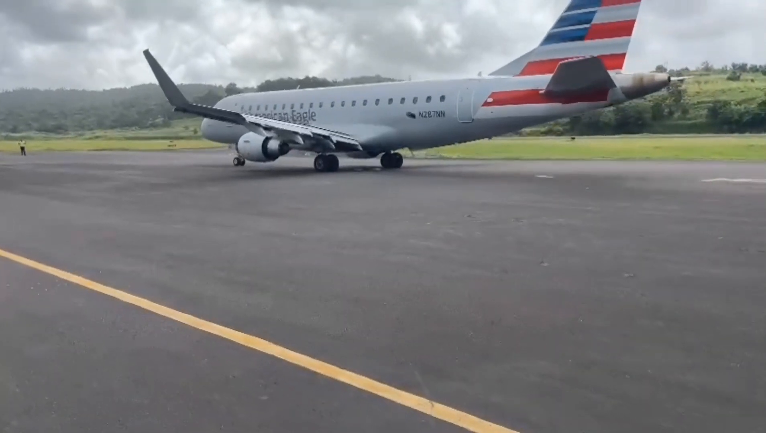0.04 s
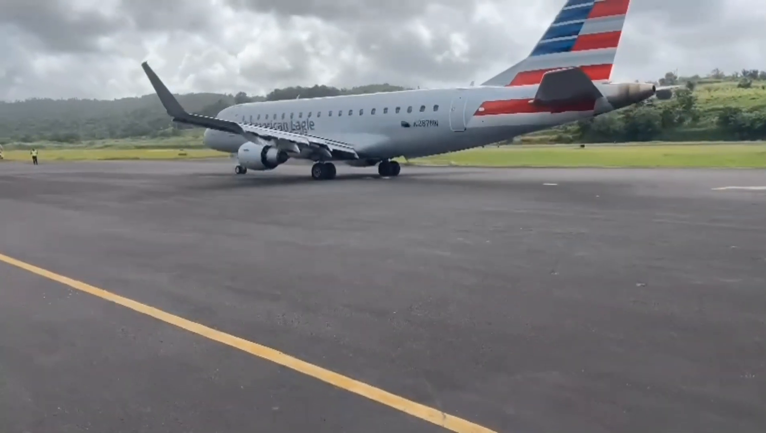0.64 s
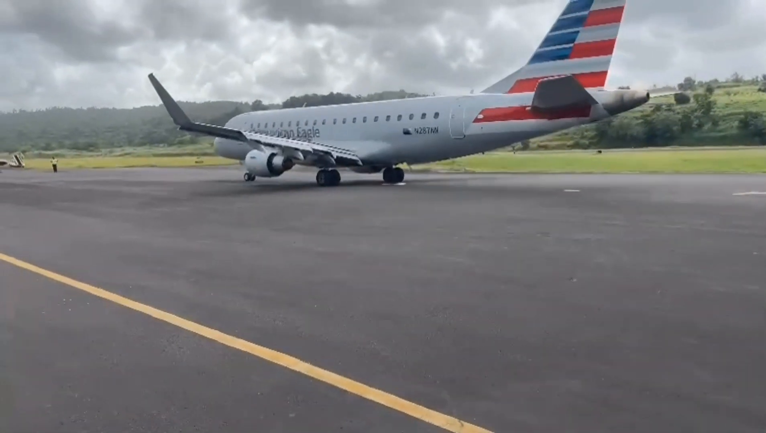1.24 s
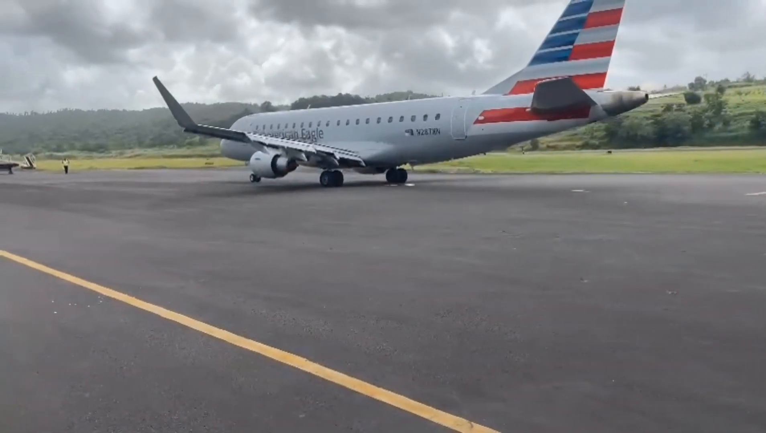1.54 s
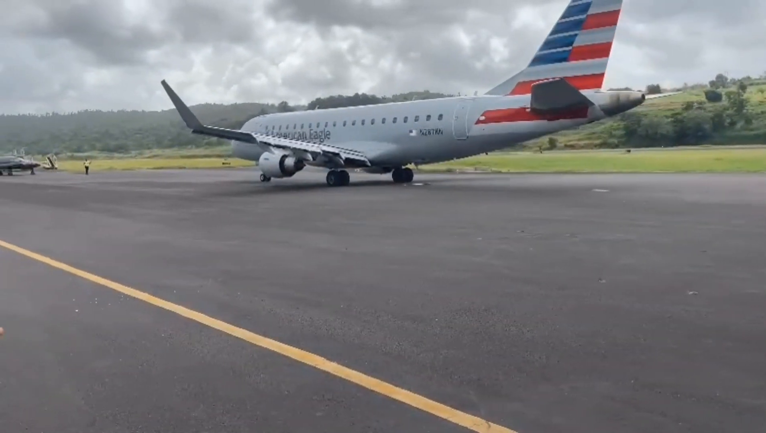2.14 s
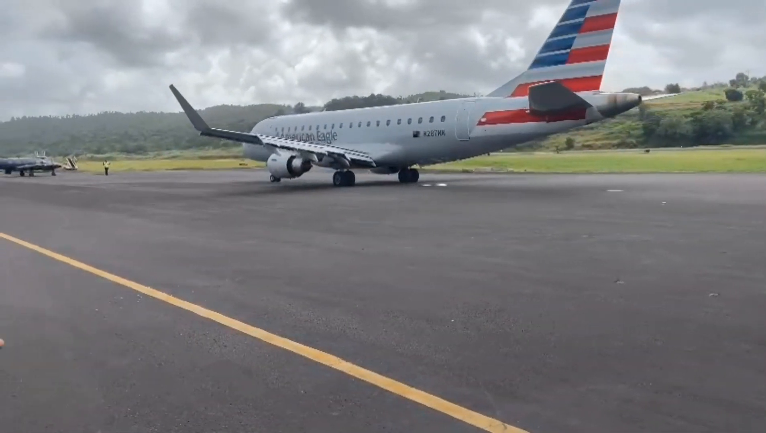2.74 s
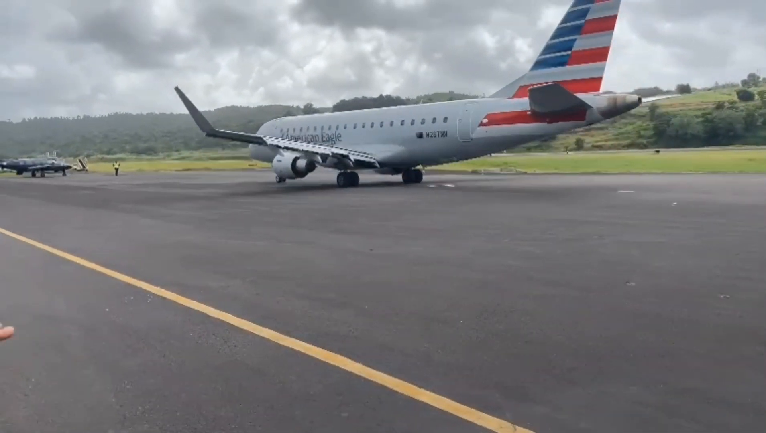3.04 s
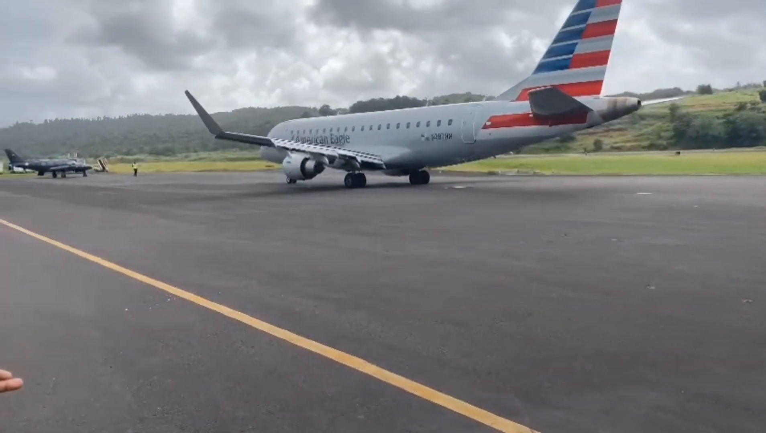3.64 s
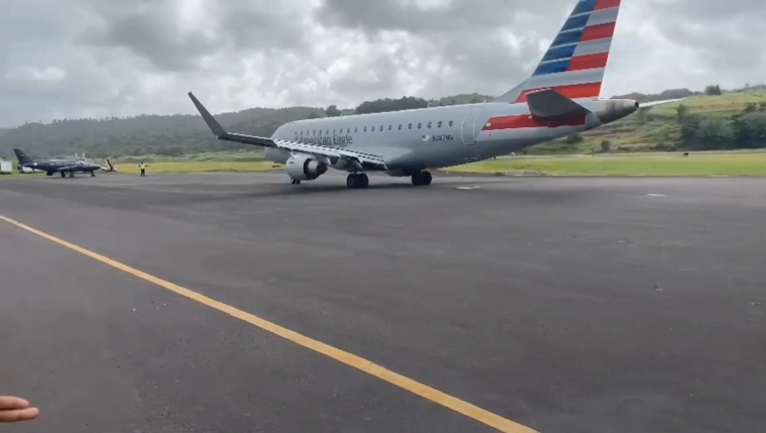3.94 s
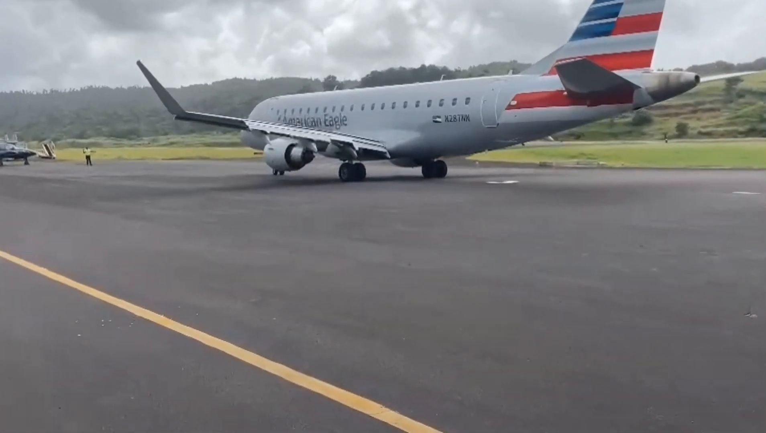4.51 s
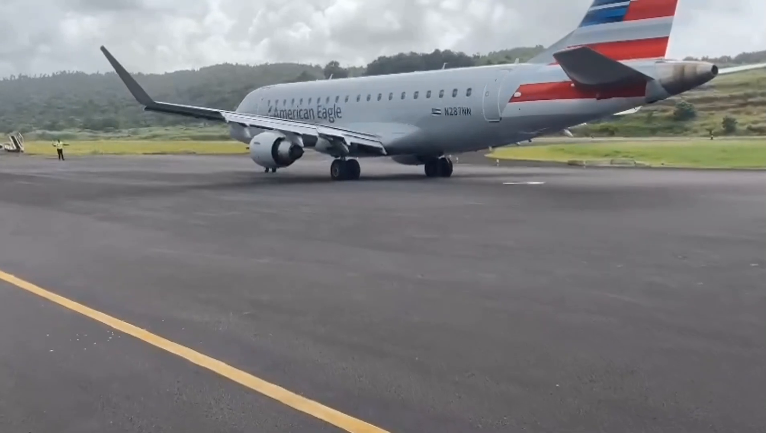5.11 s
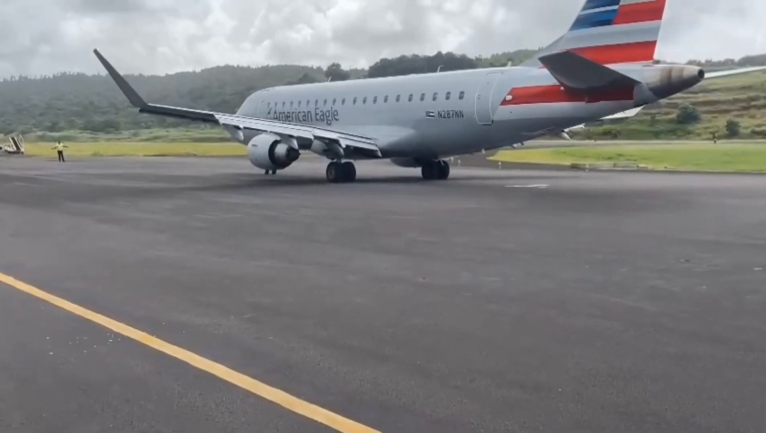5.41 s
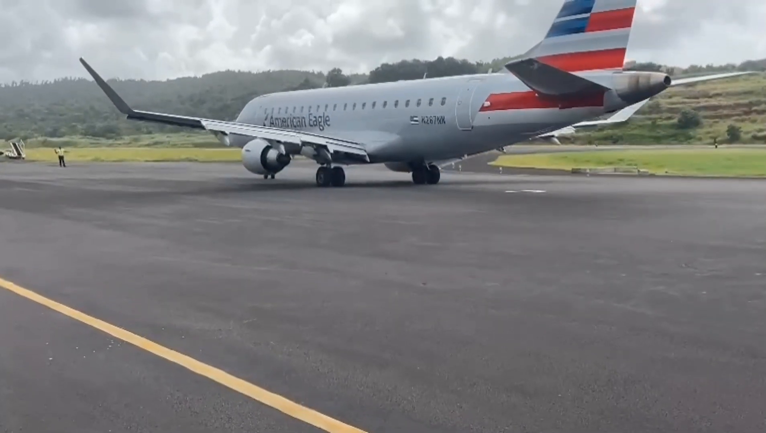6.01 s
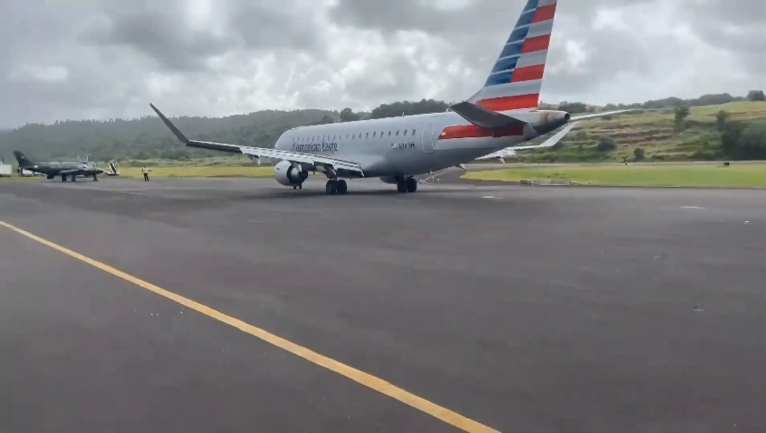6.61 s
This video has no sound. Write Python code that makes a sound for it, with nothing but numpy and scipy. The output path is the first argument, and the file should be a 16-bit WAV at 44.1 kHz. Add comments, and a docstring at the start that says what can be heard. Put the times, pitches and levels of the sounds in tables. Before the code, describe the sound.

High, wavering whistles and a rushing rumble come from a slowly departing jet's idling engines, while a breeze buffets the microphone.

```python
"""Regional jet taxiing away

Two idling turbofans move off across an open ramp. Exhaust rumble, core roar and blade hiss form
the bed; the fans hum over it and the compressor and turbine stages whistle. A breeze bumps the
hand-held microphone pair, which narrows its pickup onto the jet for two seconds near the end."""
import sys
import numpy as np
from scipy import signal
from scipy.fft import rfft, irfft
from scipy.io import wavfile

SR = 44100
rng = np.random.default_rng(int(sys.argv[2]) if len(sys.argv) > 2 else 0)


def int16_out(signal):
    """Quantize to a 16-bit WAV file."""
    q = np.round(np.clip(np.atleast_2d(signal).T, -1, 1) * 32767)
    wavfile.write(sys.argv[1], SR, q.astype(np.int16))


N = 302526
TIME = np.arange(N) / SR
BINS = np.fft.rfftfreq(N, 1 / SR)

# fader ride of the core roar and the duct howl: time_s, relative_db
CORE_RIDE = [(0, -24), (1.1, -23.5), (1.9, -25), (2.6, -24.5), (3.1, -26.5), (4.2, -21.5), (4.9, -24),
             (5.2, -27), (5.6, -28), (6.2, -29), (6.86, -34.5)]
# fader ride of the turbine's hiss and whistles: time_s, relative_db
TURBINE_RIDE = [(0, -32), (1.5, -36), (1.8, -34.5), (2.2, -34.5), (2.85, -41.5), (3.5, -34.5), (3.8, -36),
                (4.05, -29), (4.4, -34.5), (4.65, -31.5), (4.9, -37.5), (5.45, -35.5), (5.9, -41),
                (6.2, -40.5), (6.4, -47.5), (6.86, -50)]
# narrowing of the pickup: time_s, focus (0 wide, 1 narrow)
PICKUP_FOCUS = [(4.2, 0), (4.55, .35), (4.75, .75), (5.15, 1), (6.45, 1), (6.68, .25), (6.86, .2)]


def from_db(db):
    """Decibels to gain."""
    return 10 ** (np.asarray(db) / 20)


def rms_one(x):
    """Scale to unit power."""
    return x / np.sqrt(np.mean(np.abs(x) ** 2) + 1e-20)


def in_time(rows, t=TIME):
    """Each column of a curve table, joined by straight lines."""
    times, *columns = np.transpose(rows)
    return [np.interp(t, times, column) for column in columns]


def at_hz(points, hz, beyond=None):
    """Read a table on a log-frequency axis."""
    knots_hz, value = np.transpose(points)
    return np.interp(np.log(hz + 1e-9), np.log(knots_hz), value, left=beyond, right=beyond)


def follow(ride, mean_db, depth=1):
    """Gain that follows a fader ride, centred on mean_db with its swing scaled by depth."""
    level_db, = in_time(ride)
    return from_db(mean_db + depth * (level_db - level_db.mean()))


def swells(rows):
    """Gain that rises and falls in a bell around each listed moment."""
    return sum(from_db(db) * np.exp(-((TIME - peak_s) / half_s) ** 2) for peak_s, db, half_s in rows)


def noise(gain):
    """Two unrelated noises with the given gain per frequency, at unit power."""
    return rms_one(irfft(rfft(rng.standard_normal((2, N))) * gain, N))


def coloured(spectrum):
    """Noise with a tabled spectrum, silent outside it."""
    return noise(from_db(at_hz(spectrum, BINS, beyond=-np.inf)))


def humps(rows):
    """Noise gathered in resonances."""
    return sum(from_db(db) * noise(1 / (1 + ((BINS - hz) / width) ** 2)) for hz, width, db in rows)


def drift(rate_hz):
    """Random wander with spread 1, mostly slower than rate_hz."""
    return noise(1 / (1 + (BINS / rate_hz) ** 2))[0]


def shimmer(depth_db, rate_hz):
    """Hot exhaust and wind make the sound swell and fade on its way."""
    return from_db(depth_db * drift(rate_hz))


def blade_tone(hz, wander_hz, flutter_db, flutter_hz):
    """One blade row's wavering sine; each path fades on its own and the scattered one drifts in phase."""
    phase = 2 * np.pi * np.cumsum(hz + wander_hz * drift(9.4)) / SR
    offsets = (0, np.pi * drift(4.4))
    paths = [shimmer(flutter_db, flutter_hz) * np.sin(phase + offset) for offset in offsets]
    return rms_one(np.array(paths))


def puff(start_s, level_db, start_hz, end_hz=48, glide_s=0.0069, rise_s=0.0033, decay_s=0.022):
    """A puff hits one microphone port: a low thud that sinks in pitch as the eddy passes."""
    age = np.maximum(TIME - start_s, 0)
    hz = end_hz + (start_hz - end_hz) * np.exp(-age / glide_s)
    phase = 2 * np.pi * np.cumsum(hz * (age > 0)) / SR
    envelope = (1 - np.exp(-(age / rise_s) ** 2)) * np.exp(-age / decay_s)
    return from_db(level_db) * envelope / envelope.max() * np.sin(phase)


def breeze(calm_db=-58):
    """Lumpy low turbulence, different at each port, that swells in gusts and lands one strong puff."""
    # gusts over the calm: peak_s, peak_db, half_length_s
    gusts = [(0.36, -39, 0.06), (1.4, -51, 2.9), (2.03, -50, 0.09), (3.28, -44, 0.075), (4.13, -34, 0.14),
             (4.23, -32, 0.02), (4.31, -29, 0.025), (6.1, -45, 0.5), (6.78, -38, 0.2)]
    # colour of the wind on the ports: frequency_hz, relative_db
    spectrum = [(15, -20), (40, -12), (60, 17), (100, -6), (250, 9), (600, -65)]
    # the strong puff, left port then right: start_s, level_db, start_hz
    puff_hits = [(3.852, -7, 325), (3.854, -5.5, 236)]
    strength = from_db(calm_db) + swells(gusts)
    eddies = strength * coloured(spectrum) * shimmer(2.4, 13)
    return eddies + np.array([puff(*hit) for hit in puff_hits])


def exhaust_rumble():
    """The exhaust mixes with the air: a surging rumble that buffets in a narrow low band."""
    # colour of the rumble: frequency_hz, relative_db
    spectrum = [(20, -37), (40, -22), (60, -19), (85, -5), (120, 2), (200, -3), (300, -3.5), (370, -7),
                (440, -17), (520, -23), (700, -27)]
    # its fader ride: time_s, relative_db
    ride = [(0, -27), (1.1, -25.5), (2.3, -29), (3.3, -24.5), (4.2, -29), (4.6, -31), (5.2, -28),
            (5.6, -33), (6.3, -31.5), (6.86, -39)]
    # its brief surges: peak_s, peak_db, half_length_s
    surges = [(3.31, -28, 0.035), (4.41, -26, 0.031), (5.12, -30, 0.04), (5.6, -33, 0.047),
              (6.02, -31, 0.017), (6.25, -39, 0.091)]
    # buffets: peak_s, peak_db, half_length_s
    buffets = [(4.055, -22.5, 0.033), (4.65, -28.5, 0.3), (5.375, -24, 0.018)]
    # the band they shake: centre_hz, half_width_hz, gain_db
    buffet_band = [(223, 64, -2.5)]
    strength = np.hypot(follow(ride, mean_db=-30, depth=0.75), swells(surges))
    rumble = strength * coloured(spectrum) * shimmer(0.6, 36)
    return rumble + swells(buffets) * humps(buffet_band)


def core_roar():
    """Midrange roar of the engine cores, with a hump of blade noise scattered by turbulence."""
    # colour of the roar: frequency_hz, relative_db
    spectrum = [(380, -25), (480, -11.5), (620, 2.5), (720, 2), (850, -1.5), (1040, -2), (1150, -1.5),
                (1250, -1.5), (1400, 0), (1520, -2.5), (1650, -11.5), (1900, -8), (2200, -13), (2550, -55)]
    # scattered blade noise: centre_hz, half_width_hz, gain_db
    blade_hump = [(891.5, 28, -9)]
    roar = coloured(spectrum) + humps(blade_hump)
    return follow(CORE_RIDE, mean_db=-29.5, depth=0.89) * roar * shimmer(1.0, 17)


def intake_hiss(level_db=-34, turn_s=2.03, fall_db_per_s=8.6):
    """Whistling hiss beamed forwards: it holds, then falls steadily as the intakes turn away."""
    # resonances in the beam: centre_hz, half_width_hz, gain_db
    resonances = [(919, 28, -4), (2950, 32, -11.5), (3050, 47, -11), (4840, 450, -2.5)]
    beam = from_db(level_db - fall_db_per_s * np.maximum(TIME - turn_s, 0))
    return beam * humps(resonances)


def fan_hiss():
    """Broad hiss of the fan blades."""
    # colour of the hiss: frequency_hz, relative_db
    spectrum = [(1950, -16), (2250, 2.5), (2800, 3), (3500, 4), (4200, 4), (4800, 1.5), (5400, 1),
                (5850, -19)]
    # its fader ride: time_s, relative_db
    ride = [(0, -29.5), (1, -31.5), (2, -34), (2.7, -32), (3.1, -34), (3.8, -31), (4.4, -33.5), (4.65, -30),
            (4.85, -35), (5.05, -32), (5.2, -36), (5.5, -34.5), (5.9, -37.5), (6.2, -38.5), (6.55, -41.5),
            (6.86, -39.5)]
    return follow(ride, mean_db=-38) * coloured(spectrum) * shimmer(1.0, 27)


def turbine_hiss():
    """A brighter, narrower band of hiss from the turbine blades."""
    # colour of the hiss: frequency_hz, relative_db
    spectrum = [(5050, 5), (5450, 1), (5700, 8.5), (6150, 7.5), (6550, 7.5), (6800, 3), (7400, -46)]
    return follow(TURBINE_RIDE, mean_db=-39, depth=0.93) * coloured(spectrum) * shimmer(1.0, 25)


def hiss_swells():
    """The hiss flares briefly in one broad band."""
    # flares: peak_s, peak_db, half_length_s
    flares = [(4.08, -31, 0.25), (4.63, -43, 0.13)]
    # their band: centre_hz, half_width_hz, gain_db
    band = [(5060, 600, -5.5)]
    return swells(flares) * humps(band)


def high_hiss():
    """Airy blade hiss above the turbine's band."""
    # colour of the hiss: frequency_hz, relative_db
    spectrum = [(6550, -17), (6950, 0), (7400, 0.5), (8200, -3.5), (8550, -0.5), (9100, -1), (9350, -5),
                (9600, -22)]
    # its fader ride: time_s, relative_db
    ride = [(0, -42), (1.5, -42), (2.2, -40.5), (2.4, -46), (2.7, -44), (3.7, -43.5), (4.2, -39.5),
            (4.75, -40), (5.1, -44.5), (5.5, -42), (5.9, -46), (6.2, -45), (6.35, -50), (6.86, -54)]
    return follow(ride, mean_db=-43.8) * coloured(spectrum)


def sizzle():
    """Flickering top treble, threaded with faint whistles of the late stages."""
    # colour of the sizzle: frequency_hz, relative_db
    spectrum = [(9200, -32), (9550, 6), (10000, 3), (11100, 2.5), (11750, -9)]
    # whistles against the sizzle: centre_hz, half_width_hz, gain_db
    whistles = [(9268, 18, -4), (11055, 11, -21)]
    # fader ride of both: time_s, relative_db
    ride = [(0, -51), (0.3, -49.5), (0.7, -46.5), (1.5, -49.5), (2.2, -45), (2.4, -49), (2.65, -48.5),
            (2.85, -50), (3.6, -48.5), (4.1, -46), (4.3, -52), (4.65, -47), (5.1, -53), (5.5, -49.5),
            (6.25, -60), (6.86, -57)]
    return follow(ride, mean_db=-50.5) * (coloured(spectrum) + humps(whistles)) * shimmer(2.43, 15)


def fan_hum():
    """The fans hum at their blade passing rate, sinking slowly as the jet moves off."""
    # blade passing rate: time_s, pitch_hz
    pitch = [(0, 650), (1.2, 649.5), (2.5, 646.5), (3.3, 644), (4.1, 645), (4.6, 642.5), (6.86, 639.5)]
    # swelling and fading of the hum: time_s, level_db
    ride = [(0, -43), (0.65, -37), (0.82, -43), (0.92, -28.5), (1.15, -33.5), (1.55, -37), (1.85, -39.5),
            (2.1, -34), (2.53, -32.5), (2.63, -54), (2.92, -43.5), (3.08, -31.5), (3.5, -30), (3.68, -45),
            (3.88, -28.5), (4.18, -31), (4.26, -36), (4.35, -25.5), (4.9, -30), (5.3, -31.5), (5.6, -36.5),
            (6, -45.5), (6.55, -39), (6.86, -44)]
    pitch_hz, = in_time(pitch)
    level_db, = in_time(ride)
    return from_db(level_db) * blade_tone(pitch_hz, wander_hz=1.16, flutter_db=1.8, flutter_hz=15)


def duct_howl(focus_drop_db=18):
    """The ducts howl along with the core roar, and drop back while the pickup is narrowed."""
    # peak and skirt of the howl: centre_hz, half_width_hz, gain_db
    resonances = [(1802, 32, -6.5), (1800, 110, -4.3)]
    focus, = in_time(PICKUP_FOCUS)
    strength = follow(CORE_RIDE, mean_db=-36, depth=0.79) * from_db(-focus_drop_db * focus)
    return strength * humps(resonances)


def compressor_whine(flat_hz=28):
    """Two compressor tones in a noisy whine; the other engine swells in flat, beating with the first."""
    # blade passing rates of the two compressors: time_s, first_hz, second_hz
    pitches = [(0, 2900, 3055), (1.1, 2894, 3031), (2.6, 2891, 3025), (3.5, 2884, 3021), (4.4, 2892, 3022),
               (5.6, 2888, 3018), (6.86, 2875, 3004)]
    # fader ride of the first tone, which comes and goes: time_s, relative_db
    first_ride = [(0, -45), (1, -47), (1.6, -47), (2.2, -43), (2.7, -35.5), (3.1, -46), (3.42, -46),
                  (3.53, -35.5), (3.9, -64), (4.15, -46), (4.28, -36.5), (4.6, -37.5), (4.85, -53),
                  (5.1, -42.5), (5.55, -47), (5.7, -45), (6.1, -42.5), (6.3, -54), (6.65, -53), (6.8, -45)]
    # fader ride of the second tone and the whine: time_s, relative_db
    whine_ride = [(0, -32), (1.05, -28), (1.5, -39.5), (2.2, -42.5), (2.95, -38.5), (3.55, -31),
                  (4.3, -33.5), (4.9, -36), (5.5, -33.5), (6.4, -41), (6.86, -46)]
    # scattered noise around the tones: centre_hz, half_width_hz, gain_db
    skirts = [(2872, 39, -8), (2890, 100, -12.5), (3045, 47, -7.5), (3080, 150, -7.5)]
    # the other engine sings out: peak_s, peak_db, half_length_s
    other_swells = [(0.6, -51, 0.5), (3.3, -46, 0.12), (3.65, -37.5, 0.067)]
    first_hz, second_hz = in_time(pitches)
    first = blade_tone(first_hz, wander_hz=2.4, flutter_db=4.0, flutter_hz=15)
    second = blade_tone(second_hz, wander_hz=6.9, flutter_db=3.5, flutter_hz=36)
    other_engine = blade_tone(first_hz - flat_hz, wander_hz=4.6, flutter_db=4.5, flutter_hz=20)
    whine = humps(skirts) * shimmer(1.5, 30)
    return (follow(first_ride, mean_db=-47, depth=1.09) * first
            + follow(whine_ride, mean_db=-48, depth=0.95) * second
            + swells(other_swells) * other_engine
            + follow(whine_ride, mean_db=-40, depth=0.81) * whine)


def turbine_whistles():
    """Blade passing tones of the turbine and a late stage, with a breathy whistle on top."""
    turbine = blade_tone(hz=6558, wander_hz=3.2, flutter_db=3, flutter_hz=10)
    late_stage = blade_tone(hz=8365, wander_hz=7, flutter_db=3, flutter_hz=15)
    breathy = humps([(8668, 26, 0)]) * shimmer(2.5, 12)
    return (follow(TURBINE_RIDE, mean_db=-50.5, depth=1.4) * turbine
            + follow(TURBINE_RIDE, mean_db=-61, depth=1.7) * late_stage
            + follow(TURBINE_RIDE, mean_db=-52.5, depth=0.25) * breathy)


def jet():
    """Both engines as a direct and a scattered path; the hiss layers flutter together."""
    roar = exhaust_rumble() + core_roar()
    hiss = intake_hiss() + fan_hiss() + turbine_hiss() + hiss_swells() + high_hiss()
    bed = roar + sizzle() + hiss * shimmer(depth_db=0.55, rate_hz=24)
    return bed + fan_hum() + duct_howl() + compressor_whine() + turbine_whistles()


def microphone_pair(paths):
    """Sound reaches the ports apart in phase and level; focusing tightens the image and colours it."""
    # wide stereo image: frequency_hz, likeness (0-1), left_lead_rad, left_over_right_db
    wide_image = [(90, 0.84, -0.5, -2.8), (220, 0.87, -0.1, -4.5), (430, 0.71, 0.3, -0.9),
                  (600, 0.86, 1.1, -6.1), (780, 0.86, 1.3, -0.3), (990, 0.85, 1.5, 0.6),
                  (1160, 0.9, 3, -0.7), (1250, 0.16, -1.6, 2.4), (1340, 0.81, 0.4, -0.7),
                  (1510, 0.81, 1.1, -2.9), (1680, 0.82, 3.14, -2.5), (1810, 0.89, -2.1, -3.0),
                  (1940, 0.7, -0.5, -1.8), (2110, 0.79, 0, -0.2), (2400, 0.18, 1.2, -1),
                  (2580, 0.57, -3.1, -1.1), (2760, 0.23, -2.8, -0.8), (2840, 0.61, 0.4, -3.1),
                  (3060, 0.76, 1.6, -2.2), (3400, 0.88, 3.1, -0.4), (3620, 0.13, -0.1, -0.8),
                  (3960, 0.55, -2.8, -3.4), (4350, 0.3, -1.2, -0.8), (4570, 0.69, -2.9, -2.6),
                  (4780, 0.62, -1.9, -4.2), (4950, 0.56, -0.3, -2.3), (5230, 0.98, 3.14, 0),
                  (5330, 0.94, -3.1, 0), (5940, 0.26, -1.3, 4.5), (6720, 0.5, -0.5, 1.8),
                  (6930, 0.79, -3.0, 0.3), (7250, 0.78, -3.1, 0), (7750, 1, 3.14, 0), (9100, 1, 3.14, 0),
                  (9260, 0.85, 2.8, -1), (9600, 0.81, 3, 0), (9690, 0.27, 1.8, -1), (10400, 1, 0, 0)]
    # narrowed stereo image: frequency_hz, likeness (0-1), left_lead_rad, left_over_right_db
    narrow_image = [(90, 0.78, -0.1, 0.4), (900, 0.96, 0.1, -0.7), (1080, 0.83, 1.5, 2.0),
                    (1250, 0.94, -0.0, 0.4), (1720, 0.79, -0.1, -1.5), (1810, 0.66, -0.7, 3.5),
                    (2200, 0.83, 0.2, 0.4), (2370, 0.17, -1.0, 7.9), (2580, 0.91, -0.0, 0.9),
                    (4480, 0.95, 0.1, 1.6), (4780, 0.64, 0.1, 4.4), (5340, 0.59, -0.1, 4.0),
                    (5730, 0.98, -0.0, -0.2), (6800, 0.85, -0.1, -0.1), (7150, 0.55, -1.6, 0),
                    (7670, 1, 3.14, 0), (9100, 1, 3.14, 0), (9560, 0.85, 3.1, 0), (9820, 0.49, 0.3, 0),
                    (10400, 1, 0, 0)]
    # colour at full focus: frequency_hz, gain_db
    focus_eq = [(70, -0.5), (130, 2), (280, 1.5), (360, 0), (470, 1.5), (620, -0.5), (800, 2.5),
                (950, -1.5), (1250, -1), (1720, -2), (2050, 3.5), (2600, 1.5), (3000, -2.5), (3650, 0),
                (4050, -4), (4600, 0), (7000, -0.5)]
    hz, frame_s, (direct, scattered) = signal.stft(paths, SR, nperseg=2048)
    focus, = in_time(PICKUP_FOCUS, frame_s)
    log_hz = np.log(hz + 1e-9)
    coherence, balance_db = 0, 0
    for image, weight in ((wide_image, 1 - focus), (narrow_image, focus)):
        knots_hz, likeness, lead_rad, left_db = np.transpose(image)
        log_knots = np.log(knots_hz)
        coherence += np.outer(np.interp(log_hz, log_knots, likeness * np.exp(1j * lead_rad)), weight)
        balance_db += np.outer(np.interp(log_hz, log_knots, left_db), weight)
    mid = np.sqrt(1 + np.abs(coherence)) * direct
    side = np.sqrt(1 - np.abs(coherence)) * scattered
    lead = np.exp(1j * np.angle(coherence))
    balance = from_db(balance_db)
    ports = np.array([(mid + side) * lead * balance, mid - side]) / np.sqrt(1 + balance ** 2)
    colour = from_db(np.outer(at_hz(focus_eq, hz), focus))
    return signal.istft(ports * colour, SR)[1][:, :N]


def scene():
    """The jet through the microphone pair, with the breeze on top."""
    return microphone_pair(jet()) + breeze()


def record(dry):
    """A steep low-pass takes off the very top."""
    cutoff_hz = 11750
    return signal.sosfilt(signal.ellip(12, .1, 90, cutoff_hz, fs=SR, output="sos"), dry)


dry = scene()
out = record(dry)
int16_out(out)
```